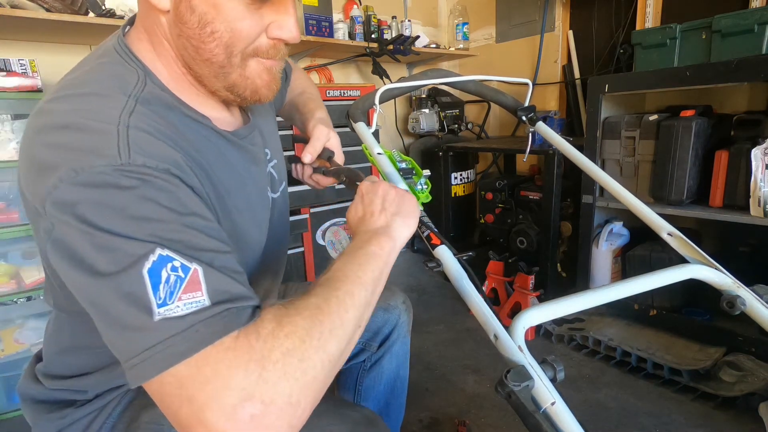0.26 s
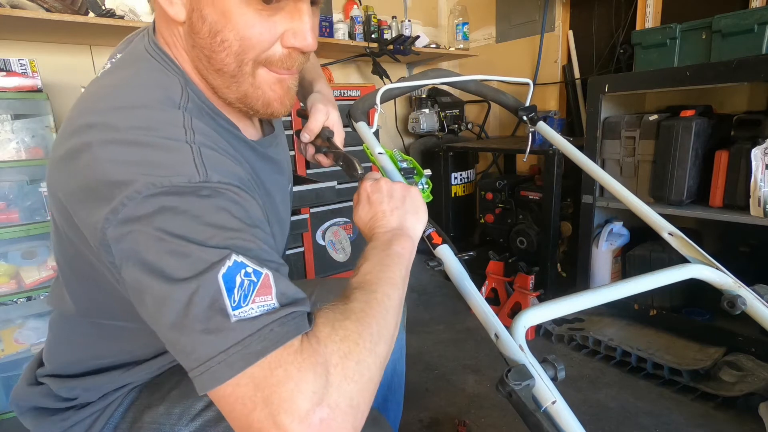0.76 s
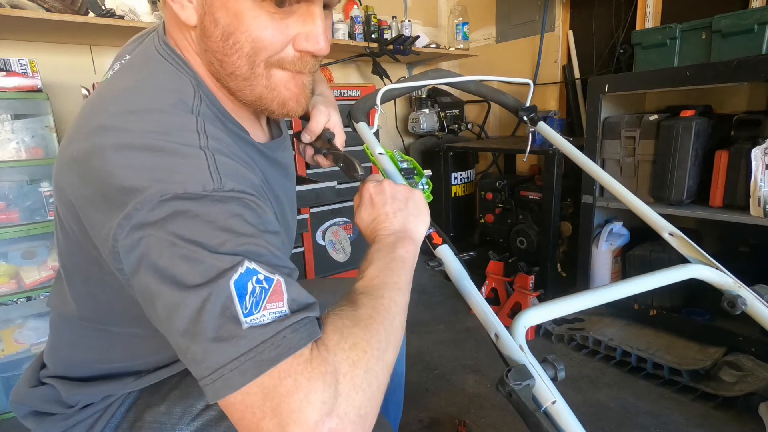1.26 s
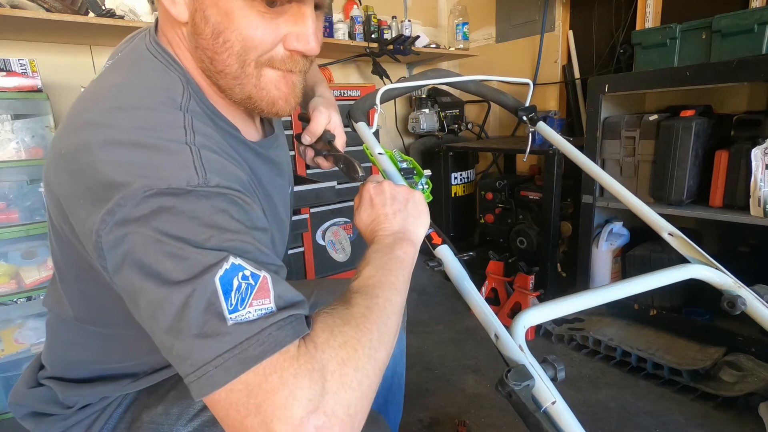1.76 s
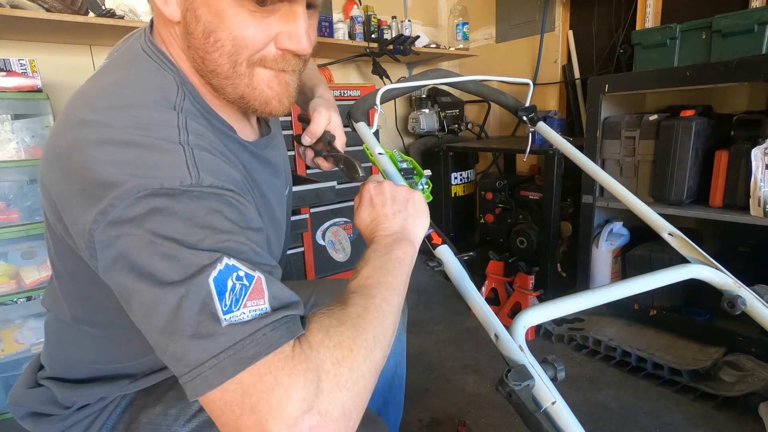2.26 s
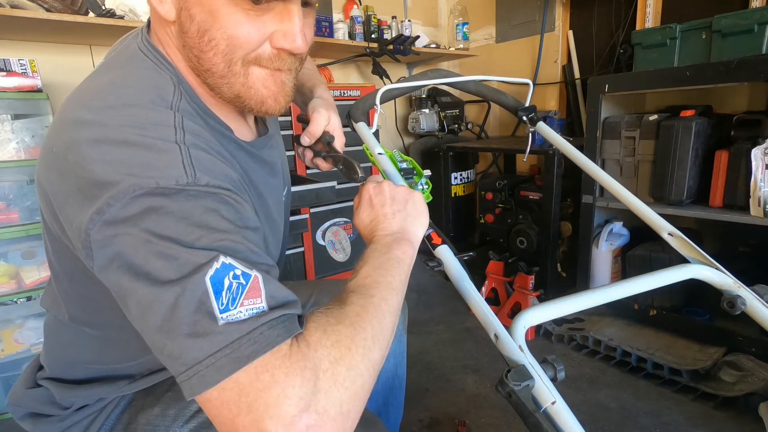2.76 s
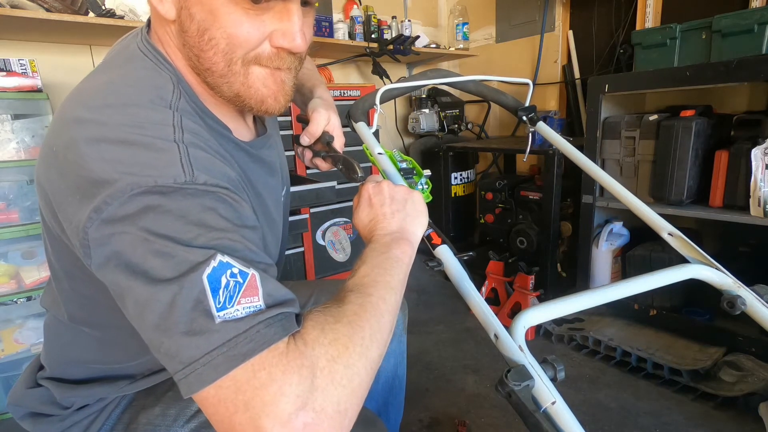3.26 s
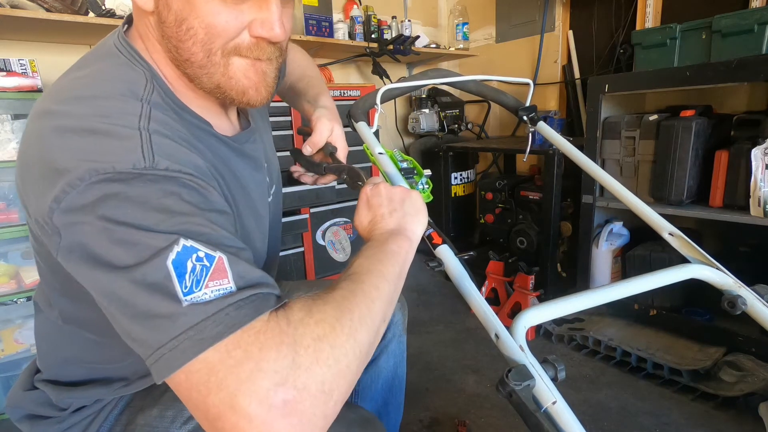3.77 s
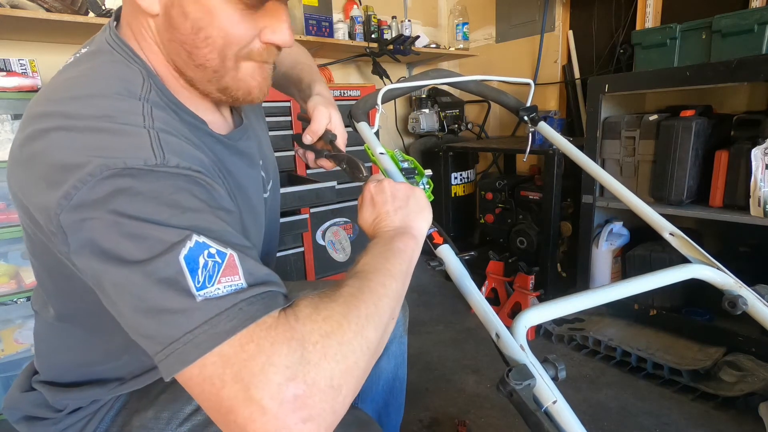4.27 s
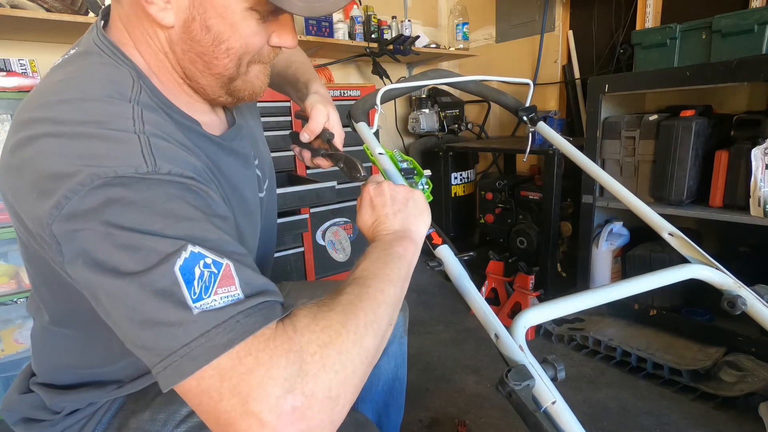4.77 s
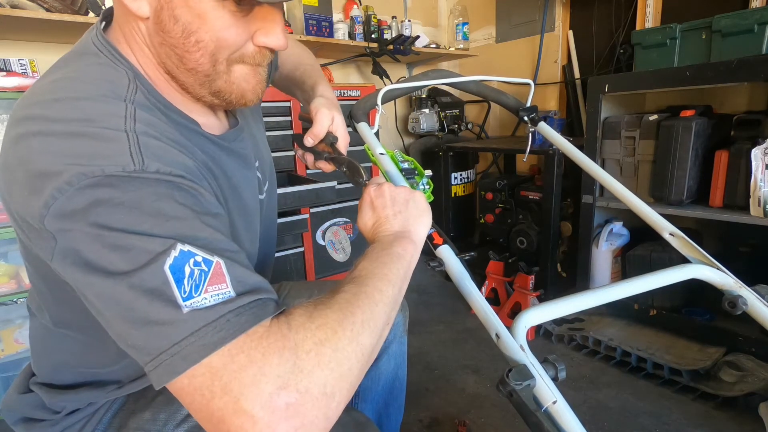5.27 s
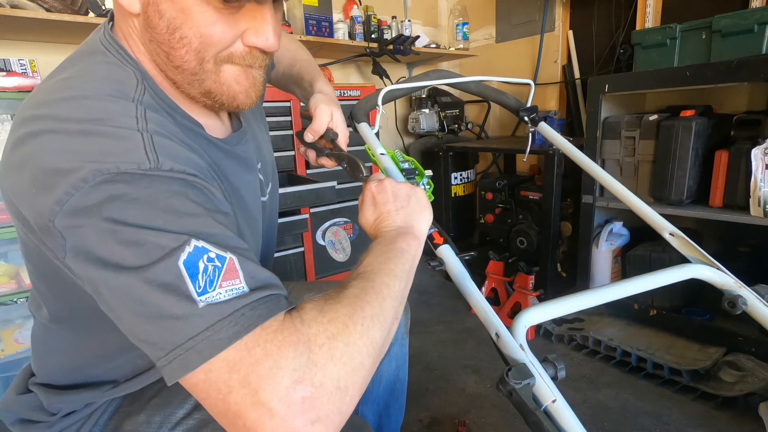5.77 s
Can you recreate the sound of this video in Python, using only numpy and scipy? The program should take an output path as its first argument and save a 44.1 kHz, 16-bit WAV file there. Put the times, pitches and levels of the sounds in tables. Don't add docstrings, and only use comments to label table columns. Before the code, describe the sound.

A quiet garage, heard in stereo a couple of metres from a battery mower. Cloth brushes softly in the first 0.3 s, with low stand bumps at 0.3 and harder at 0.53; a plastic switch clacks at 0.72. From 0.9 the motor starts with a low growl and faint electronic whine, blade knocks quickening into a rising hum. By about 2.4 it nears full speed: a drone around 100 passes per second with strong multiples, slightly throbbing, under broad rushing air and tip hiss. Released at 3.45, it drops fast with a brief deck surge. Clacks at 3.71, 3.82 and 4.25 ring the housing, with a faint steel ring lingering. A second start at 4.43 climbs only partway, quieter, until 5.26, cut by a sharp brake clack at 5.29. Near-silence follows, with a last clack at 5.79, a soft bump and a short room tail.

```python
import sys
import numpy as np
from scipy import signal
from scipy.fft import rfft, irfft, next_fast_len
from scipy.io import wavfile
from scipy.ndimage import uniform_filter1d

SR = 44100
rng = np.random.default_rng(int(sys.argv[2]) if len(sys.argv) > 2 else 0)


def dump(signal):
    limited = np.clip(np.atleast_2d(signal).T, -1, 1)
    pcm = np.round(limited * 32767).astype(np.int16)
    wavfile.write(sys.argv[1], SR, pcm)


def ratio(d):
    e = np.asarray(d, float) / 20
    return 10 ** e


N = 266011
T = np.arange(N) / SR
SIZE = next_fast_len(N + SR)
HZ = np.arange(SIZE // 2 + 1) * SR / SIZE
OCTAVE = np.log2(HZ + 1)
FULL_HZ = 100.3

# start t/s, switch released t/s, air collapses t/s, brake surge in the deck level/dB
SPINS = [
    (.9, 3.45, 3.517, 13),
    (4.43, 5.26, 5.287, 1.5),
]
# f/Hz, width/Hz, level/dB
DECK_MODES = [(181.3, 9.4, 7), (279.7, 9.8, -6.5), (327, 102, -16), (490, 29, -14.5), (572, 61, -15)]
# f/Hz, density/dB per Hz
TIP_HISS = [(1410, -12), (2400, 1.5), (2570, -3.5), (4240, -7), (5000, -7.5), (5490, -2), (7210, -6),
            (8630, -14), (12600, -27), (14300, -63), (15500, -74)]
# t/s, peak level/dB, low mode f/Hz, t60/s
STAND_BUMPS = [
    (0.295, -27, 69.2, 0.61),
    (.315, -25, 76, 0.15),
    (0.53, -19, 72.7, 0.11),
    (0.553, -20, 66, 0.35),
    (3.559, -32, 81, 0.31),
    (5.29, -37, 84.6, 0.34),
    (5.829, -36.5, 61.4, 0.3),
]


def on_log(points):
    f, v = np.transpose(points)
    return np.interp(np.log(HZ + 1), np.log(f + 1), v)


def shape(x, gain):
    return irfft(rfft(x, SIZE) * gain, SIZE)[..., :N]


def unit(x):
    return x / np.sqrt(np.mean(x ** 2))


def noise():
    return rng.standard_normal(N)


def walk(rate):
    hold = int(SR / rate)
    steps = np.repeat(rng.standard_normal(N // hold + 1), hold)
    return 1.6 * uniform_filter1d(uniform_filter1d(steps, hold), hold)[:N]


def dying(t, t60):
    return np.exp(-np.log(1000) * t / t60)


def resonance(hz, width):
    return 1j * HZ * width / (hz ** 2 - HZ ** 2 + 1j * HZ * width)


def modes(table):
    return sum((-1) ** k * ratio(db) * resonance(hz, width) for k, (hz, width, db) in enumerate(table))


def octave_band(k):
    return np.clip(1 - abs(OCTAVE - k), 0, 1) ** .5


def bands(points, flicker_db, rate):
    colour = ratio(on_log(points))
    return unit(sum(ratio(flicker_db * walk(rate)) * shape(noise(), colour * octave_band(k)) for k in range(4, 15)))


def spin_clock():
    rows = np.array(SPINS)
    row = rows[np.clip(np.searchsorted(rows[:, 0], T) - 1, 0, None)].T
    return T - row[0], np.clip(T - row[1], 0, None), np.clip(T - row[2], 0, None), row[3]


def driven_speed(run_s):
    creep_hz, ramp_hz_per_s, knee_hz, soft_start_s = 5, 56.6, 82.6, .17
    ramp = (creep_hz + ramp_hz_per_s * run_s) * (1 - np.exp(-(run_s / soft_start_s) ** 2))
    room = FULL_HZ - knee_hz
    past = run_s - (knee_hz - creep_hz) / ramp_hz_per_s
    eased = FULL_HZ - room * np.exp(-np.clip(past, 0, None) * ramp_hz_per_s / room)
    return 2 + np.where(past > 0, eased, ramp) - np.clip(run_s * 10, 0, 2)


def blade_phase():
    brake_s, first_knock_s, second_knock_s = .25, 1.286, 4.688
    run_s, off_s, _, _ = spin_clock()
    powered = driven_speed(np.clip(run_s - off_s, 0, None))
    speed = 2 + (powered - 2) * np.exp(-(off_s / brake_s) ** 2)
    passes = np.cumsum(speed * (1 + .002 * walk(12))) / SR
    first, second = passes[int(first_knock_s * SR)], passes[int(second_knock_s * SR)]
    return speed, passes - np.where(T < 4.3, first, second)


def speed_reached():
    run_s, off_s, _, _ = spin_clock()
    return (run_s > 0) * driven_speed(run_s - off_s) + .01


def follows(share, full_db, slope_db, fade_db):
    fading_s = spin_clock()[2]
    return uniform_filter1d(full_db + slope_db * np.log10(share) - fade_db * fading_s, size=900)


def garage_hush():
    # f/Hz, density/dB per Hz
    garage_colour = [(76, -40), (130, -6), (180, 3), (660, -8), (1000, -18), (1800, -17), (2600, -17),
                     (5000, -19), (6500, -17), (8400, -29), (14000, -45)]
    return ratio(-64) * np.array([bands(garage_colour, flicker_db=4.0, rate=2.55) for _ in range(2)])


def port_wind(speed):
    still_db, stir_db, stir_t60_s, draught_db = -69.5, -28.5, 1.33, -61
    low = shape(rng.standard_normal((2, N)), resonance(36, 65) ** 2)
    stir = sum(ratio(db + stir_db - 60 * (T - s) / stir_t60_s) * (T > s) for s, db, _, _ in STAND_BUMPS)
    level = ratio(still_db) + stir + ratio(draught_db) * np.clip(speed / 70, 0, 1) ** 3
    port_db = np.array([[-4.0], [2.5]])
    return level * ratio(3 * walk(24) + port_db) * unit(low)


def walls(x):
    # f/Hz, t60/s
    wall_t60 = [(100, 0.8), (500, 0.46), (2000, .45), (6000, 0.54), (14000, 0.2)]
    # f/Hz, level/dB
    wall_level = [(60, -52), (180, -7), (350, -1.5), (700, -5.5), (4000, -7.5), (9000, -4), (15000, -18)]
    t, tail = T[:SR // 2 + SR // 4], 0
    f, t60 = np.transpose(wall_t60)
    for k in range(5, 15):
        decay = dying(t, np.interp(k, np.log2(f), t60)) * (t > .006)
        echo = rng.standard_normal((2, len(t))) * decay / np.sqrt(np.sum(decay ** 2))
        tail = tail + rfft(echo, SIZE) * octave_band(k)
    return shape(x, tail * ratio(on_log(wall_level)))


def rustle():
    # t/s, length/s, level/dB
    strokes = [
        (0, .012, -59),
        (.2, .025, -60),
        (.28, .035, -59),
        (.12, .1, -70),
    ]
    grains = noise() * ratio(4 * walk(70))
    moves = sum(ratio(db) * np.exp(-((T - s) / length) ** 2) for s, length, db in strokes)
    return moves * unit(shape(grains, resonance(550, 600) ** 2 + .45 * resonance(1900, 2200) ** 4))


def bumps():
    out = np.zeros((2, N))
    for s, peak_db, hz, t60 in STAND_BUMPS:
        t = np.clip(T - s, 0, None)
        turn = 2 * np.pi * hz * t
        for port, (port_db, lead) in enumerate([(-11.5, 2.2), (0.5, 0.59)]):
            wobble = np.sin(turn + lead) * dying(t, t60)
            overtone = 0.52 * np.sin(2.5 * turn + lead) * dying(t, 0.73 * t60)
            knock = 0.4 * np.sin(3.86 * turn) * dying(t, 0.35 * t60)
            sway = 0.083 * np.sin(0.19 * turn + lead) * dying(t, 1.9 * t60)
            onset = 1 - np.exp(-(t / 0.0023) ** 2)
            out[port] += ratio(peak_db + port_db) * onset * (wobble + overtone + knock + sway)
    return out


def clacks():
    # t/s, peak level/dB, body level/dB, snap level/dB, ring/s
    blows = [(0.551, -47.5, 2, -14, 0.19), (0.723, -25, -6, -13, 0.17), (0.909, -67.5, -6, 7.5, 0.16),
             (3.713, -23.5, -3, -12.5, 0.12), (3.817, -32.5, -0.5, -36, 0.17), (3.872, -45, 2.5, -34, 0.36),
             (4.136, -48, 3.5, -14, 0.25), (4.249, -27, -3.5, -11, 0.17), (4.443, -63, 16, -24.5, 0.28),
             (5.288, -25.5, 2.5, -7.5, 0.27), (5.309, -54, -6, -26, 0.14), (5.791, -30, -0.5, -8, 0.2),
             (6.024, -67, 20.5, -23, 0.14)]
    # f/Hz, width/Hz, level/dB
    housing = [(180, 30, 1), (275, 60, -3), (355, 60, 0), (460, 90, -2), (720, 200, -7), (1130, 250, -9),
               (1560, 300, -8), (1900, 400, -10), (3100, 1800, -21), (6000, 2200, -21), (8200, 2500, -25)]
    deck_ring_db, deck_ring_s, top_hz = -4, .6, 13000
    out, t = np.zeros(N + SR), T[:SR // 2]
    mouth = resonance(1360, 12600) ** 2 / (1 + (HZ / top_hz) ** 8)
    for s, peak_db, body_db, snap_db, ring in blows:
        bursts = rng.standard_normal((4, len(t))) * (1 - np.exp(-(t / .0026) ** 2))
        parts = [(body_db + 0.5, housing[:5], .012, 1.6),
                 (0, housing[5:8], .006, 1.15),
                 (snap_db + 9.5, housing[8:], .005, .9),
                 (body_db + deck_ring_db, DECK_MODES[:2], .03, deck_ring_s / ring)]
        start = int((s - .001) * SR)
        for burst, (part_db, table, push, stay) in zip(bursts, parts):
            rattle = .5 * dying(t, stay * max(ring, .06))
            hit = shape(burst * (np.exp(-t / push) + rattle), modes(table) * mouth)[:len(t)]
            out[start:start + len(t)] += ratio(peak_db + part_db + 18.5) * hit
    return out[:N]


def rings():
    # t/s, f/Hz, level/dB, t60/s
    lines = [(3.72, 297.4, -56.5, 8), (3.72, 383, -52, 1.6)]
    return sum(ratio(db) * (T > s) * (T < 4.3) * np.sin(2 * np.pi * hz * T) * dying(T - s, t60)
               for s, hz, db, t60 in lines)


def controller():
    growl_db, growl_db_per_s, ramp_ends_s, fade_db_per_s = -59, 15, 0.94, 31
    carrier_hz, carrier_db, carrier_rise_s = 10100, -77, .5
    sizzle_db, sizzle_rise_s = -65, .22
    run_s, off_s, _, _ = spin_clock()
    fade_db = -fade_db_per_s * np.clip(run_s - ramp_ends_s, 0, None) - 400 * off_s
    on = np.clip(run_s / 0.088, 0, 1) * ratio(fade_db)
    windings = resonance(568, 130) ** 2 + 0.29 * resonance(464, 140) ** 2
    growl = ratio(growl_db + growl_db_per_s * np.clip(run_s, 0, ramp_ends_s)) * unit(shape(noise(), windings))
    rise = np.clip(run_s / carrier_rise_s, 0, 1) ** 1.5
    carrier = np.sin(2 * np.pi * carrier_hz * T + .9 * walk(150))
    carrier = rise * ratio(carrier_db + 3 * walk(60)) * carrier
    sizzle = np.clip(run_s / sizzle_rise_s, 0, 1) ** 2 * bands(TIP_HISS, flicker_db=1.0, rate=20)
    return on * (growl + carrier + ratio(sizzle_db) * sizzle)


def deck_hum(speed, swing):
    start_hz, loudest_hz, surge_s = 5, 48.5, .03
    run_s, off_s, _, surge_db = spin_clock()
    share = np.clip((speed_reached() + start_hz * (run_s > 0)) / loudest_hz, 0, 1)
    level_db = follows(share, full_db=-32.5, slope_db=32.7, fade_db=95)
    level_db = level_db + surge_db * (1 - np.exp(-(off_s / surge_s) ** 2))
    body = modes(DECK_MODES) * resonance(330, 600) ** 2 * np.clip(HZ / 150, 0, 1) ** 4
    hum = unit(shape((1 + 0.6 * swing) * ratio(2.5 * walk(12)) * noise(), body))
    return ratio(level_db) * hum * np.clip(1.25 - speed / 105, .2, 1)


def mount_knock(speed, passes):
    # f/Hz, width/Hz, level/dB
    mount = [(988, 120, -3), (1454, 114, -9.5), (1710, 160, -10), (2110, 330, -15)]
    since_s = passes % 1 / speed
    strength = ratio(1.8 * rng.standard_normal(400))[passes.astype(int) % 400]
    burst = (strength * np.exp(-since_s / 0.005) + 0.21) * noise()
    return unit(shape(burst, modes(mount) * resonance(1500, 4500)))


def air_rush(speed, passes, swing):
    # f/Hz, density/dB per Hz
    rush_colour = [(80, -38), (130, -9), (250, -3), (450, -1), (700, -3), (1000, 0.5), (1500, -2.5),
                   (2400, -13.5), (3500, -15.5), (5000, -43.5)]
    airy = np.clip(speed / 75, .12, 1) ** 1.32
    rush = airy * (1 + 0.15 * swing) * bands(rush_colour, flicker_db=0.15, rate=14)
    rush = rush + 0.79 * (1.15 - airy) * mount_knock(speed, passes)
    rush = rush - np.clip(1.5 - speed / 60, 0, .9) * shape(rush, HZ < 115)
    rumble = unit(shape(noise(), resonance(80, 100) ** 2))
    rumble = (speed / 100) ** 2.5 * ratio(1.5 * walk(8.1)) * rumble
    level_db = follows(speed_reached() / FULL_HZ, full_db=-28, slope_db=27.1, fade_db=105)
    return ratio(level_db) * (rush + ratio(-25.5) * rumble)


def tip_hiss(speed, swing):
    hiss = (1 + .05 * swing) * bands(TIP_HISS, flicker_db=.5, rate=20)
    top = shape(hiss, np.clip((HZ - 9000) / 3000, 0, 1))
    hiss = hiss - np.clip(1.1 - speed / 75, 0, .7) * top
    return ratio(follows(speed_reached() / FULL_HZ, full_db=-33.5, slope_db=51, fade_db=188)) * hiss


def blade_tones(speed, passes):
    # multiple, level/dB
    low_multiples = [(1, -45), (2, -36.5), (3, -38.5), (4, -41)]
    # multiple, level/dB
    high_multiples = [(5, -39), (6, -39), (7, -49), (8, -38.5), (9, -50), (10, -41), (11, -49), (12, -46),
                      (14, -46)]
    # multiple, f/Hz, width/Hz, level/dB
    crossed = [(2, 182, 30, 12), (3, 191, 14, 11), (3, 256, 16, 13), (4, 183, 20, 8), (4, 275, 14, 9),
               (4, 384, 12, 4)]
    throb_hz, throb_dip_s, throb_share, throb_from_hz, throb_fade_s = 4.3, 2.585, .7, 90, .7
    tones_from_hz, clean_from_hz, cut_s, second_spin_db = 44, 55, .06, -9
    phase, off_s = 2 * np.pi * passes, spin_clock()[1]
    beat = np.cos(2 * np.pi * throb_hz * (T - throb_dip_s))
    beat = beat * np.exp(-np.clip(T - throb_dip_s - .3, 0, None) / throb_fade_s)
    throb = 1 - throb_share * np.clip((speed - throb_from_hz) / 5, 0, 1) * beat
    growth_db = 28 * np.log10(speed / FULL_HZ)
    low = 0
    for k, db in low_multiples:
        k = round(k)
        lift = 1 + sum(ratio(mode_db) / (1 + (2 * (k * speed - hz) / width) ** 2)
                       for which, hz, width, mode_db in crossed if round(which) == k)
        sway = throb * ratio(1.2 * walk(25)) if k == 2 else ratio(3.3 * walk(28))
        low = low + lift * sway * ratio(db + growth_db) * np.sin(k * phase + .5 * walk(18))
    low = low * np.clip(speed / tones_from_hz, 0, 1) ** 8 * ratio(second_spin_db * (T > SPINS[1][0]))
    high = sum(ratio(db + 3.5 * walk(16)) * np.sin(k * phase + 1.2 * walk(25)) for k, db in high_multiples)
    clean = np.clip((speed - clean_from_hz) / (FULL_HZ - clean_from_hz), 0, 1) * np.exp(-(off_s / cut_s) ** 2)
    return np.sqrt(2) * (low * np.exp(-(off_s / 0.088) ** 2) + ratio(0.5) * clean * high)


def at_ports(air):
    # f/Hz, level/dB
    port_level = [(60, 0), (110, -0.5), (200, -1.5), (380, -6), (700, -11), (1290, -5.5), (2380, -2.5),
                  (4400, -8), (8120, -3), (15000, 3)]
    # f/Hz, phase/rad
    port_phase = [(0, -5), (200, -0.38), (520, -0.84), (950, -3), (2840, -5), (3530, -4.5), (4310, -5),
                  (4650, -5), (5000, -8.5), (5430, -8), (6030, -8.5), (6290, -5.5), (8100, -5.5),
                  (15000, -5.5), (15200, -9.5)]
    left = ratio(on_log(port_level)) * np.exp(1j * on_log(port_phase))
    both = np.array([left, left ** 0])
    return shape(air, both / np.sqrt((1 + abs(left) ** 2) / 4 + 0.26 * left.real))


def scene():
    speed, passes = blade_phase()
    swing = np.cos(2 * np.pi * passes)
    mower = deck_hum(speed, swing) + air_rush(speed, passes, swing) + tip_hiss(speed, swing)
    near = mower + controller() + clacks() + rustle() + rings()
    air = near + walls(near) + blade_tones(speed, passes) + garage_hush()
    return at_ports(air) + bumps() + port_wind(speed)


def band_limit(x):
    return signal.sosfilt(signal.butter(12, 15640, fs=SR, output="sos"), x)


def record(dry):
    mix = shape(dry, HZ < 15600)
    return band_limit(mix)


dry = scene()
out = record(dry)
dump(out)
```